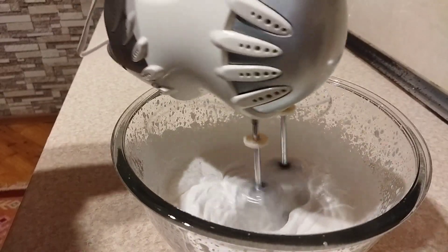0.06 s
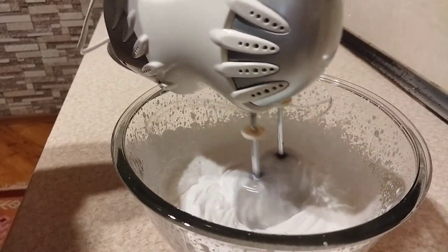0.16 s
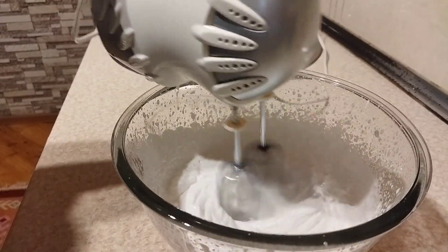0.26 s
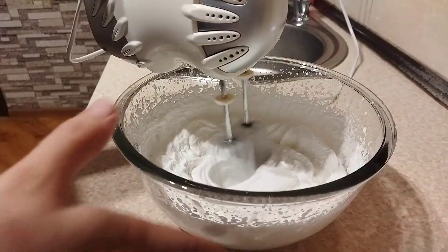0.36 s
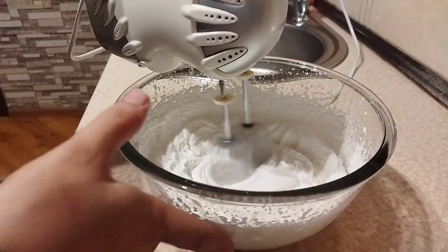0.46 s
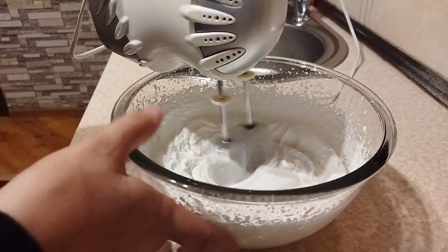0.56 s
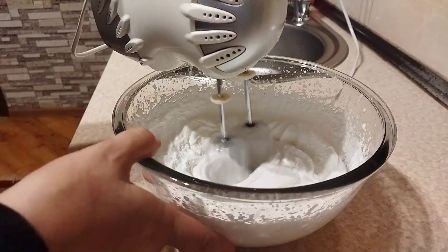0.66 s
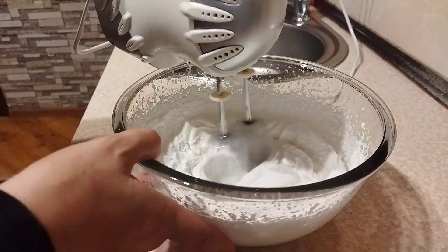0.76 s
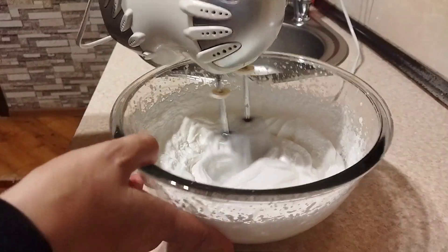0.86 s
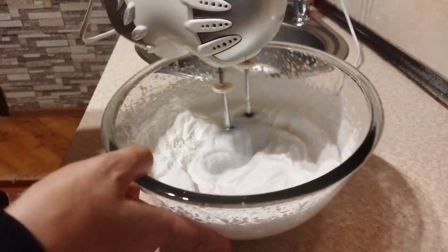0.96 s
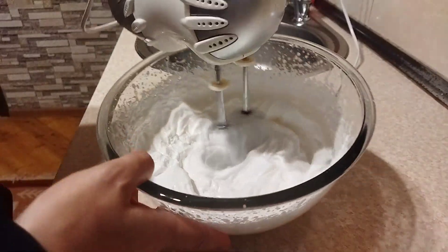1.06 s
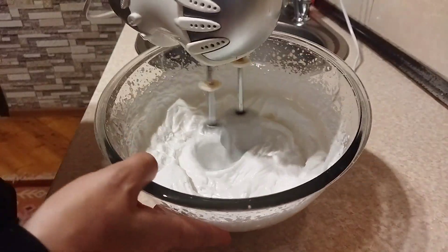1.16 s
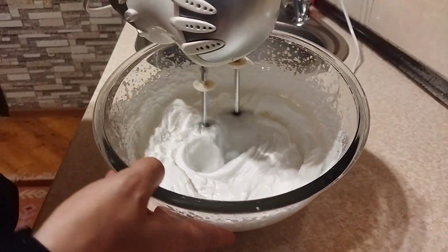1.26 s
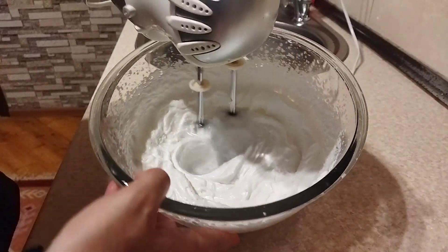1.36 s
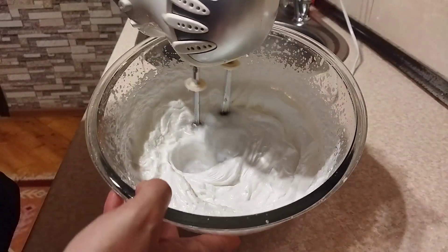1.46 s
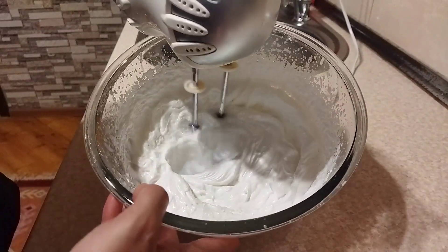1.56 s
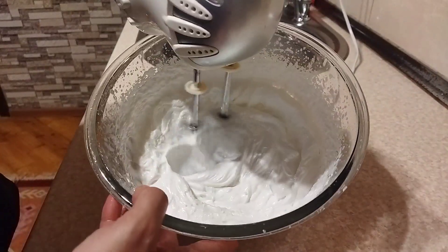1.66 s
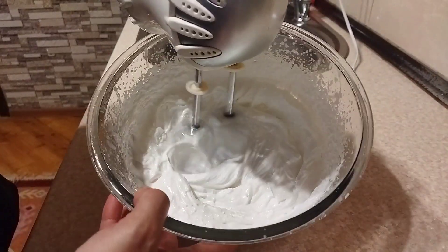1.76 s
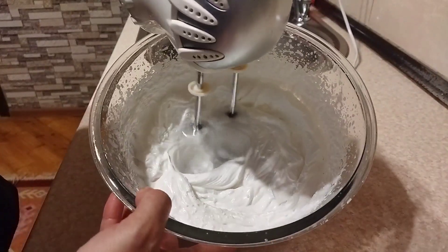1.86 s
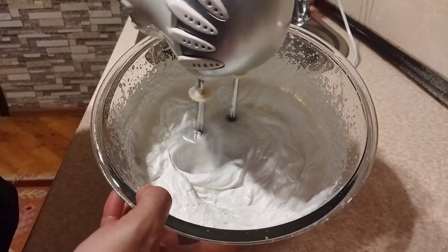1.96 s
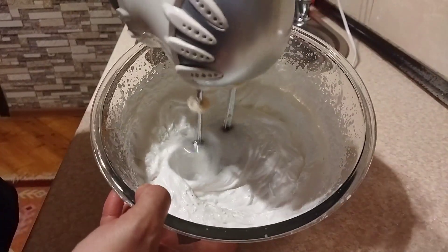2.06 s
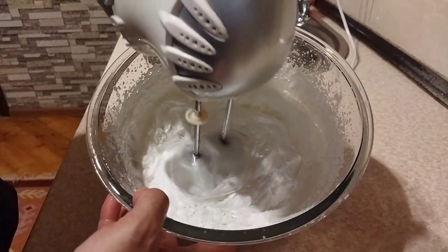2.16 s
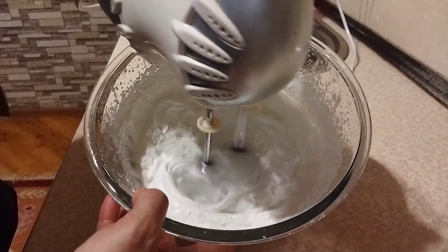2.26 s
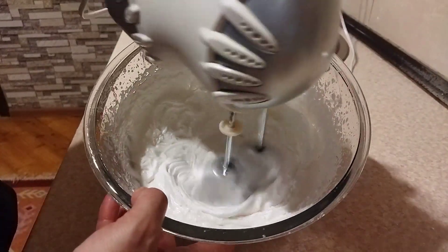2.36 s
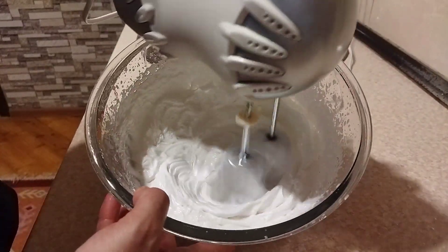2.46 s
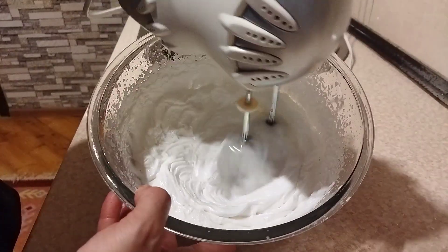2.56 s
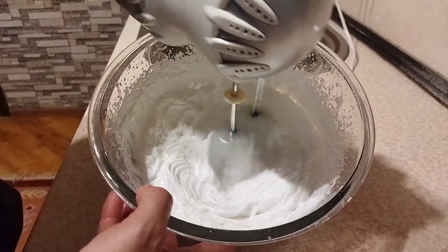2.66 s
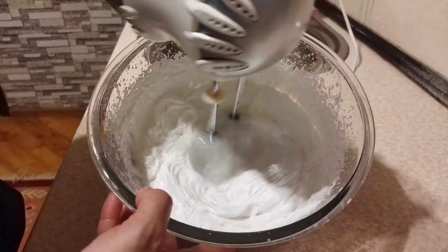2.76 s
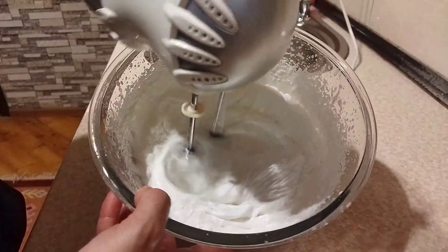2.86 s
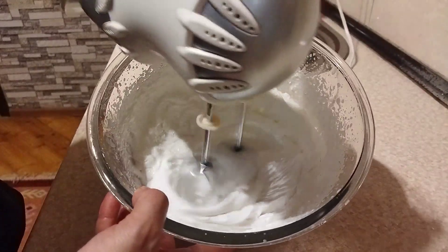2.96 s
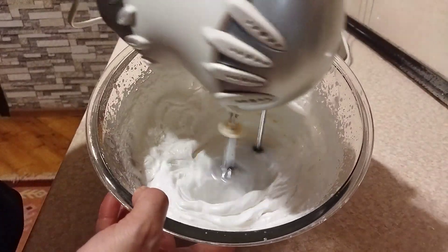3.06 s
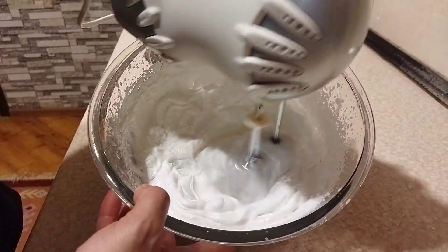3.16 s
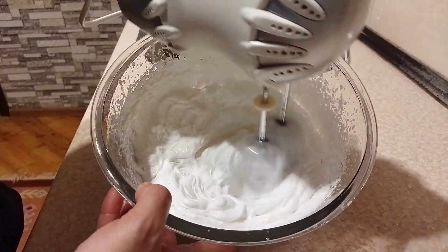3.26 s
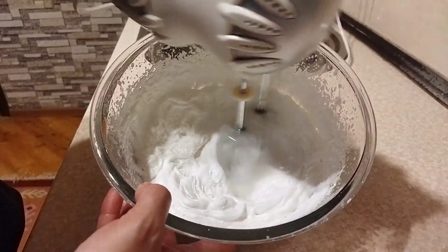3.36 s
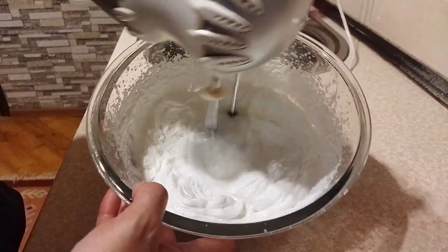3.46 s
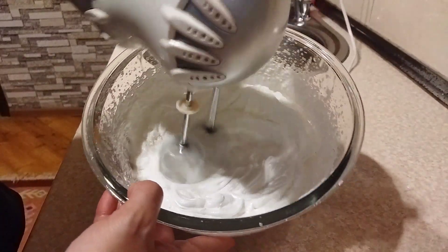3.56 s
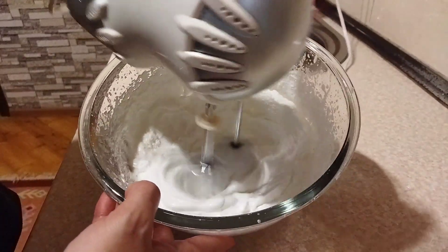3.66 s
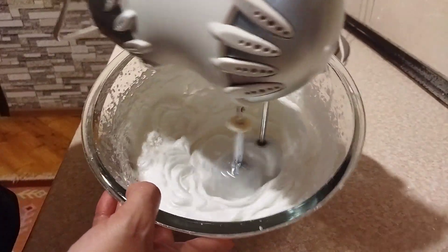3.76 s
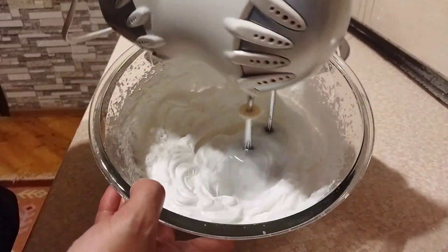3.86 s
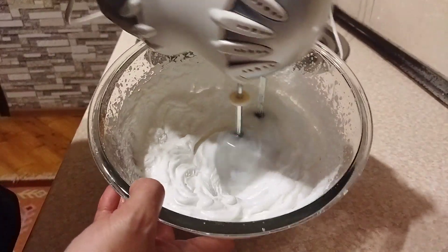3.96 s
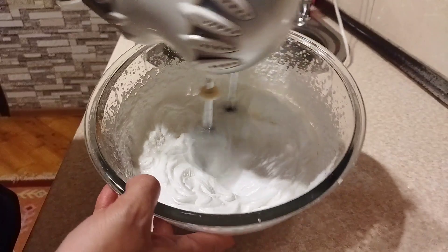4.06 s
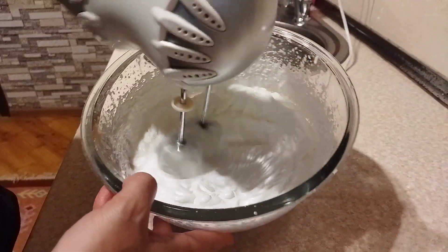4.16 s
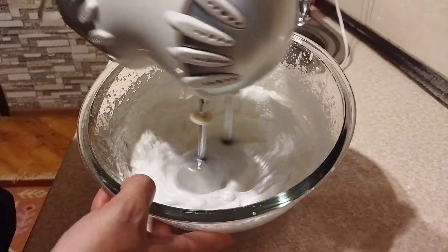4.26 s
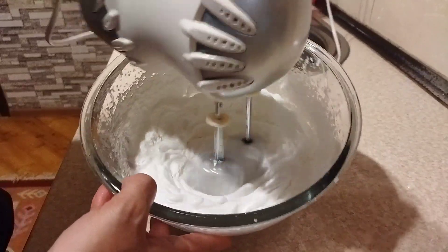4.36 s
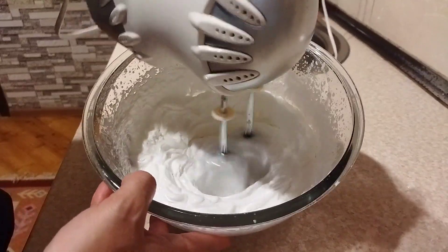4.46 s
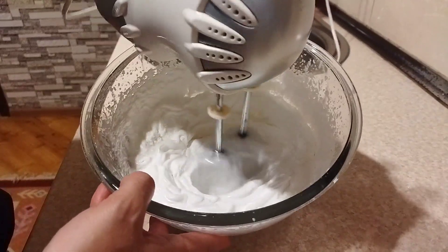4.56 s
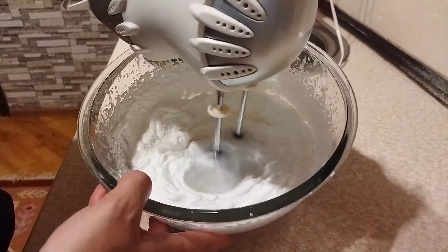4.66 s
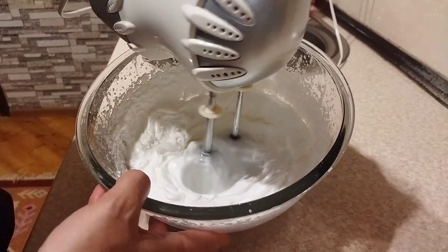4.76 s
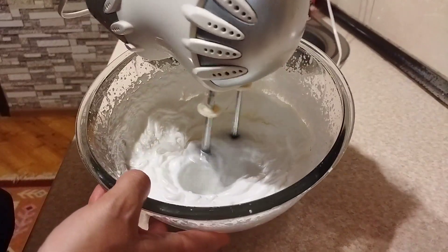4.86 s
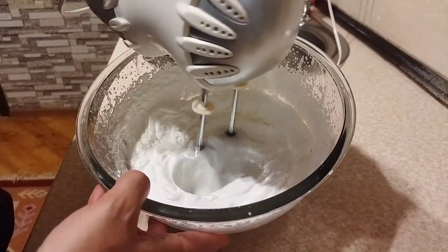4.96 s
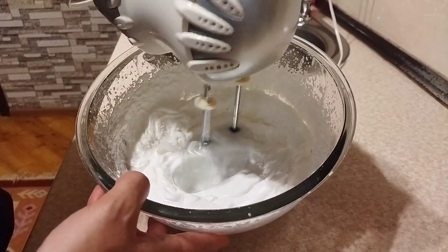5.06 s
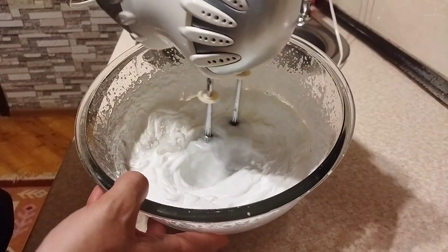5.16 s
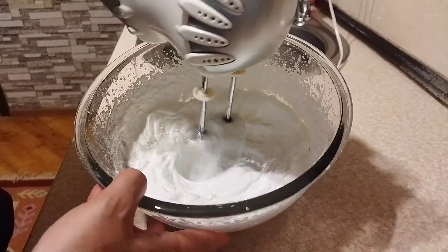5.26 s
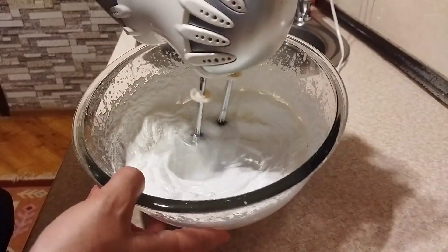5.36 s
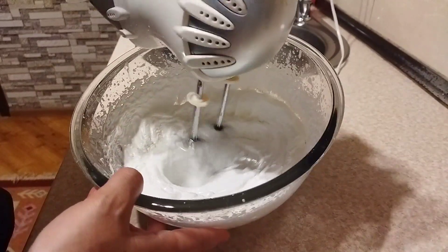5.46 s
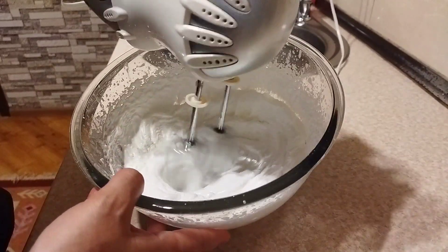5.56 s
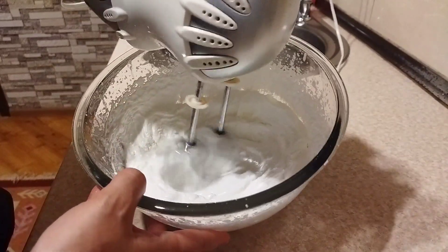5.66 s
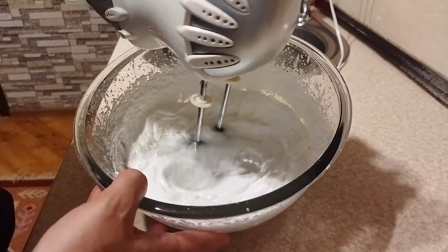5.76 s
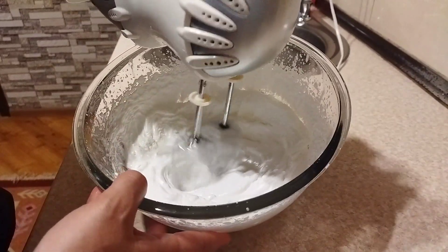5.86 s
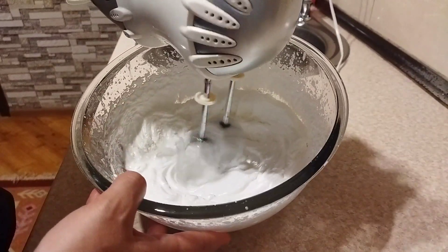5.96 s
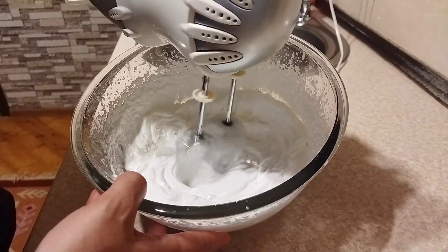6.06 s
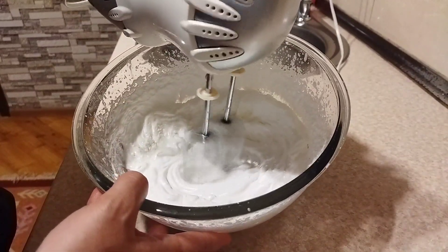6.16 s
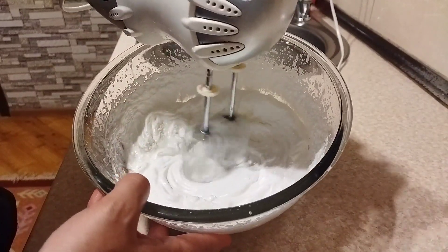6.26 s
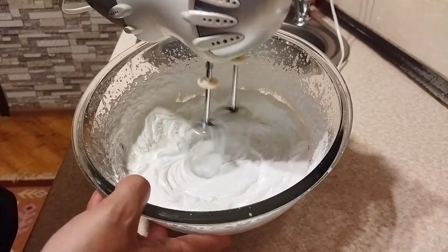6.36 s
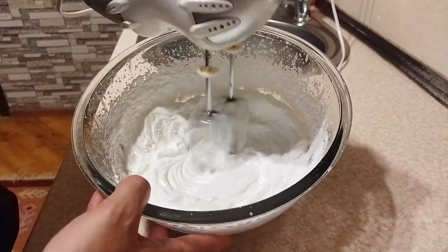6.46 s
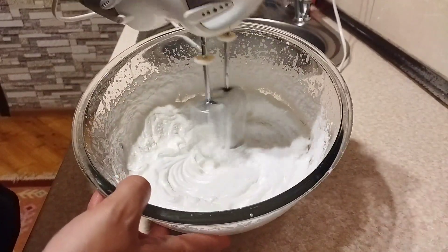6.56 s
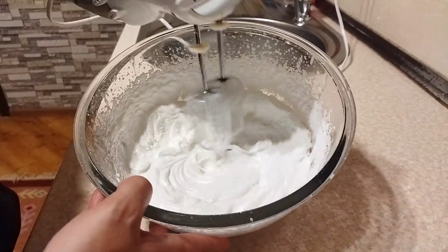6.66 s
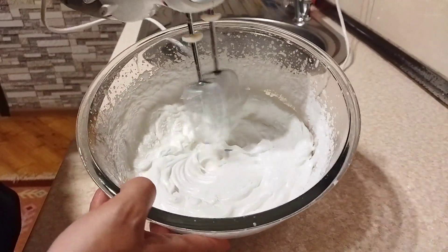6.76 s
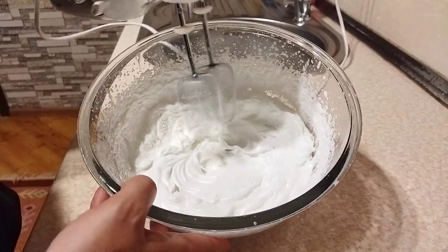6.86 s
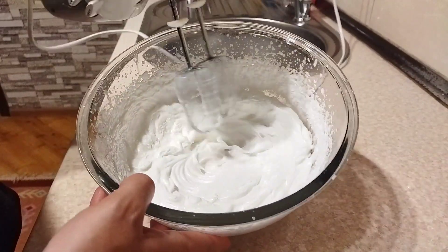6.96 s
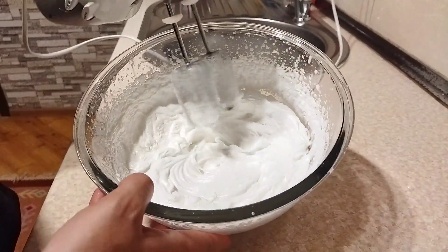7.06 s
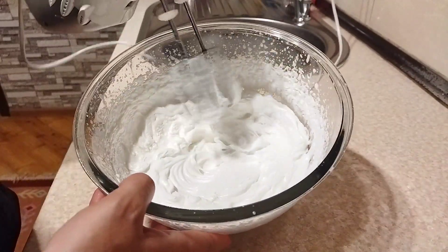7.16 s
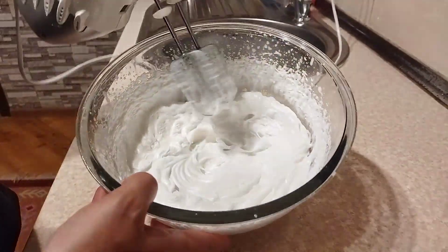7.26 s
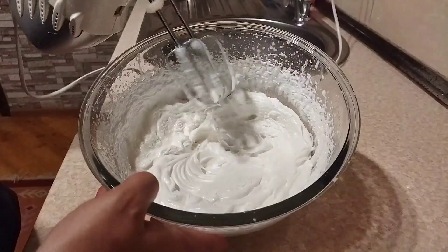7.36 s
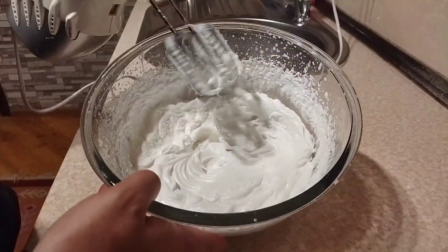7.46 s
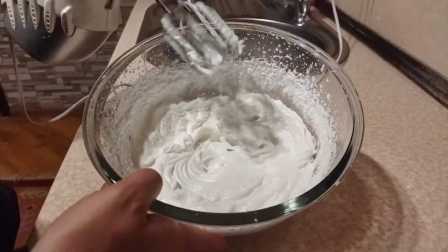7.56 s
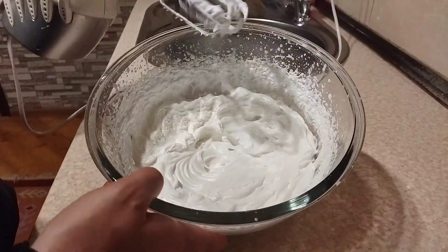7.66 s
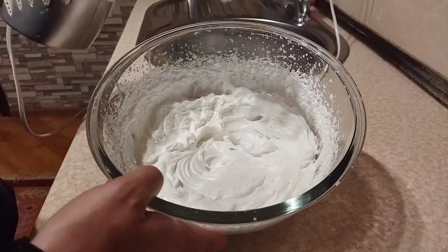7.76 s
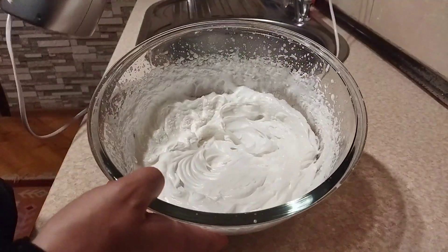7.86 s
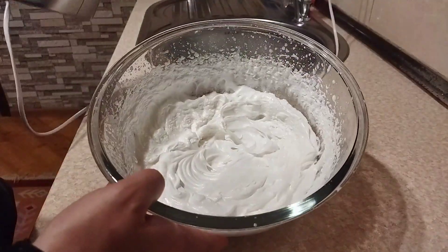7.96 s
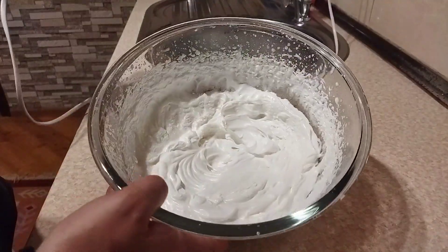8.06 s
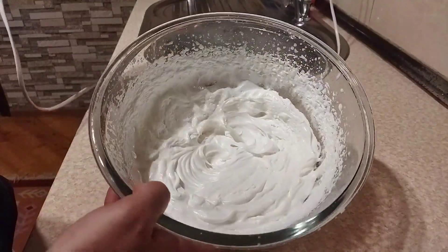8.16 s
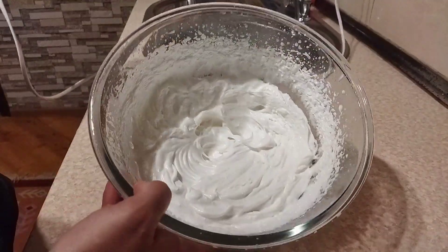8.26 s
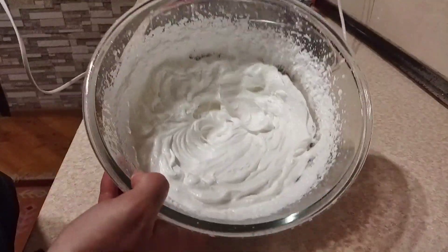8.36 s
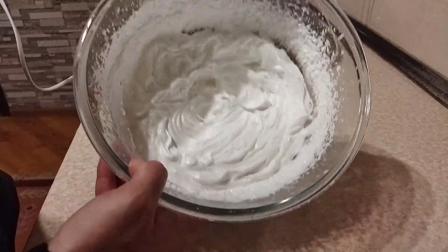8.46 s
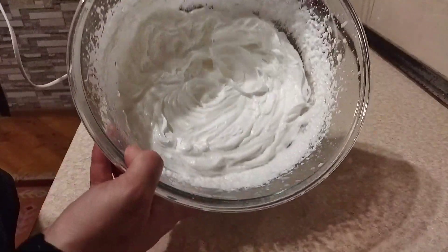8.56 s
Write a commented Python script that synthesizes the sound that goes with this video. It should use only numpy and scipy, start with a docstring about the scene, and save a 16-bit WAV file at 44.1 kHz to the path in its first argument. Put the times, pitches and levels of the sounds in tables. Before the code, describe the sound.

A buzzing hand mixer with a steady motor whine, gear clatter and airy fan noise thumps thick cream in a ringing glass bowl. After a tiny early dropout it runs on with bursts of fluttering slaps, bright scrapes and rattles. Then it coasts downward, softening, until slowing blades tinkle irregularly on the glass. Close stereo pickup, light kitchen reflections, faint high hiss at the end.

```python
"""An electric hand mixer whips cream in a glass bowl on a kitchen counter, close to the microphone.
At first the motor, built from tones locked to its turning shaft, hums and whines; the sound soon breaks
off briefly and swells back. A worm gear turns two beaters, whose blades are pulses that thump the cream
and ring the bowl; noise bursts slap, splash and rasp. Switched off, the motor winds down and is lifted
out, the last blades clink on the glass as ringing modes, and a thin high noise hiss is left and fades."""
import sys
import numpy as np
from scipy import signal
from scipy.fft import rfft, irfft
from scipy.io import wavfile
from scipy.ndimage import uniform_filter1d

SR = 44100
rng = np.random.default_rng(int(sys.argv[2]) if len(sys.argv) > 2 else 0)


def transcribe(u):
    """Save the signal u as a 16-bit wav file named by the first command-line argument.

    u: samples, shape (n,) or (channels, n), limited to [-1, 1]; the rate is SR.
    q: integer samples, one column per channel.
    """
    v = np.clip(np.atleast_2d(u).T, -1, 1)
    q = np.round(v * 32767).astype(np.int16)
    wavfile.write(sys.argv[1], SR, q)


N = 379260
T = np.arange(N) / SR  # time in seconds
FREQS = np.arange(N // 2 + 1) * SR / N  # Hz

# shaft turns per beater turn, and blades that pass in one beater turn
GEAR_RATIO, BLADES = 21.5, 8
# the sound breaks off once; before the break the motor runs a little slower
BREAK_S, BREAK_END_S, OPENING_HZ = .292, .32, 445.4
# switched off, the rotor coasts against air drag (time constant) and bearing friction
OFF_S, OFF_EASE_S, DRAG_S, FRICTION_HZ_PER_S = 5.207, .42, 3.8, 72.4
# the beaters are lifted out and the churning dies away
LIFT_S, LIFT_DB_PER_S = 6.33, 39
# each part: base level in dB, and the power of the speed by which it fades
GEAR_DB, GEAR_POWER = -36.5, 2.12
BRUSH_DB, BRUSH_POWER = -33, 2.42
CHURN_DB, CHURN_POWER = -37, 0.97
# widths of a slap's thud and splash, decay of a tick, ring of a wire to -60 dB
SLAP_S, SPLASH_S, TICK_DECAY_S, WIRE_T60_S = 0.017, 0.022, 0.037, 0.026
TOP_HZ = 16000

# Shaft speed under power, drifting with the load. Each row: time in seconds, speed in Hz.
POWERED_SPEED = [(1.2, 466), (2, 467.6), (3.7, 464.4)]
# Hum tones of the motor shaft. Each row: multiple of the shaft turn, relative level in dB.
SHAFT_ORDERS = [(1, -5), (3, -4), (4, -6.5)]
# Resonances of bowl and housing that shaft overtones fall through. Each row: centre in Hz, width in Hz,
# relative level in dB.
OVERTONE_RESONANCES = [(1020, 140, -36), (2050, 110, -28), (2950, 380, -34)]
# Fan whistle, coming and going as the mixer is moved about. Each row: time in seconds, level in dB.
WHISTLE_LEVEL = [(0, -56), (1.25, -49), (2.7, -53), (2.93, -39), (3.3, -60), (3.62, -39), (3.95, -53),
                 (4.12, -40), (4.7, -47), (5, -44), (5.4, -54), (6.2, -62)]
# Faint gear strands just above the whistle. Each row: multiple of the beater turn, relative level in dB.
GEAR_STRANDS = [(201, -54), (206, -53)]
# Commutator whine, swelling and fading as the mixer is turned. Each row: time in seconds, level in dB.
WHINE_LEVEL = [(0, -44), (1.1, -52), (1.9, -46), (2.28, -43), (2.6, -56), (2.91, -46), (3.22, -54),
               (4.99, -45), (5.8, -45), (6.2, -61)]
# Octave of the commutator whine. Each row: time in seconds, level in dB.
WHINE_OCTAVE_LEVEL = [(0, -41), (.5, -50), (1.1, -55), (1.38, -44), (1.8, -51), (2.65, -42), (3.19, -48),
                      (4.44, -42), (4.85, -56), (5.47, -38), (5.98, -53), (6.4, -48), (7.29, -72)]
# Closeness of the mixer to the microphone. Each row: time in seconds, gain in dB.
CLOSENESS = [(0, 0), (1.8, 0.85), (2.3, 2), (5, 1.5), (5.6, 2.5)]
# Spectrum of the gear housing. Each row: frequency in Hz, relative level in dB per Hz.
GEAR_SPECTRUM = [(150, -11.5), (500, 2.5), (800, -13), (1040, 1.5), (1170, 2), (1300, -14.5), (2100, -11),
                 (2900, -4), (6000, -18)]
# Spectrum of brushes and fan. Each row: frequency in Hz, relative level in dB per Hz.
BRUSH_SPECTRUM = [(300, -7.5), (1500, 4.5), (2300, -1), (3800, 1), (4400, 6), (4900, 2.5), (6400, -1),
                  (7100, -5), (8400, -2), (9800, -2.5), (11000, -14), (11900, 1.5), (16000, -14.5)]
# Drone tones of the loaded beaters. Each row: multiple of the beater turn, relative level in dB.
BEATER_ORDERS = [(11, -16.5), (13, -11.5), (14, -12), (28, -13), (38, -16)]
# How hard the beaters bite into the cream. Each row: time in seconds, gain in dB.
BITE = [(0, -6.5), (.6, 3), (1.4, -1.5), (1.8, -7), (2.2, 3.5), (2.8, -0.5), (5, 0), (5.7, -3)]
# Resonances of the cream-filled bowl. Each row: centre in Hz, width in Hz, relative level in dB.
BOWL_RESONANCES = [(231, 8.1, -0.5), (299.2, 56, 4.5), (453.6, 58, -2.5), (630.5, 50, -6)]
# Shaking of bowl and counter against the churning, less as the beaters leave the bottom.
# Each row: time in seconds, gain in dB.
RUMBLE_LEVEL = [(1.8, -7.5), (2.4, -12.5), (4.4, -7), (4.7, -15.5), (6.2, -10.5), (6.5, -26)]
# Spectrum of wet splatter. Each row: frequency in Hz, relative level in dB per Hz.
SPLATTER_SPECTRUM = [(300, -10), (750, -13.5), (1550, -3.5), (2300, -9), (7000, -17), (16000, -14)]
# Blades slapping into heaped cream. Each row: centre in seconds, relative level in dB.
SLAPS = [(2.204, -29.5), (2.247, -33), (2.294, -32), (2.339, -30.5), (2.384, -31), (2.431, -30.5),
         (2.478, -29), (2.940, -30.5), (2.985, -30.5), (3.028, -30.5), (3.080, -33), (3.122, -30),
         (3.165, -28), (3.214, -27), (3.635, -28.5), (3.678, -29), (3.724, -30), (3.770, -29),
         (3.812, -28.5), (3.859, -26), (3.888, -33), (4.234, -28), (4.284, -32), (4.37, -29),
         (4.421, -28.5), (5.45, -38), (5.665, -37.5), (5.785, -38.5), (5.906, -32.5), (6.04, -35),
         (6.128, -37)]
# Wires rasping along the glass. Each row: centre in seconds, level in dB, width in seconds.
SCRAPES = [(2.64, -29, 0.069), (3.334, -27.5, 0.16)]
# Spectrum of wires rasping on glass. Each row: frequency in Hz, relative level in dB per Hz.
RASP_SPECTRUM = [(900, -13), (1400, -12), (1570, 0), (1750, -4), (7000, -9), (10300, -6), (16000, -15)]
# Beater wires knocking on the wall under the cream. Each row: start in seconds, relative level in dB.
RATTLES = [(2.486, -23), (2.517, -23), (2.846, -26), (3.156, -21), (3.194, -23), (3.238, -22), (3.255, -19),
           (3.286, -20), (3.299, -19.5), (3.85, -32), (4.122, -21), (4.362, -27)]
# Blades clinking on the glass.
# Each row: start in seconds, relative level in dB, centre of the blow's spectrum in Hz.
CLINKS = [(7.371, -1.5, 4700), (7.39, -7, 2580), (7.41, 2.5, 3940), (7.439, -8, 4030), (7.45, 1, 3720),
          (7.502, -6, 3530), (7.545, -0.5, 3730), (7.593, -1, 2300)]
# Modes of bowl and beater. Each row: frequency in Hz, relative level in dB, time to fall 60 dB in seconds.
GLASS_MODES = [(300, 3, 0.3), (422, 6, 0.26), (1120, -8, 0.38), (2045, -19, 0.64), (2084, 1.5, 0.19),
               (3200, -22, 0.6), (3254, 8.5, 0.093), (4690, -18, 0.63), (6400, -6, 0.098),
               (7500, 6.5, 0.065), (10020, 5, 0.048)]
# Spectrum of the thin hiss. Each row: frequency in Hz, relative level in dB per Hz.
HISS_SPECTRUM = [(500, -22.5), (2200, -14), (3700, -13.5), (5500, -18), (8000, -5), (8800, 4),
                 (10800, -5.5), (12000, -2.5), (13300, -2.5), (15500, -2)]
# Course of the thin hiss. Each row: time in seconds, relative level in dB.
HISS_LEVEL = [(0, -40), (6.7, -38.5), (8.36, -41.5), (8.45, -52), (8.6, -62)]
# Small ticks as the mixer is switched off and the bowl is picked up.
# Each row: start in seconds, relative level in dB, centre in Hz.
TICKS = [(5.088, -32, 9000), (8.472, -44.5, 10600)]
# Spectrum of the quiet room. Each row: frequency in Hz, relative level in dB per Hz.
ROOM_SPECTRUM = [(45, -49), (105, -9), (380, -4.5), (600, -18), (6000, -28)]
# Diffuse share of the kitchen. Each row: frequency in Hz, diffuse against direct sound in dB.
DIFFUSE_SHARE = [(80, -18), (250, -8), (1100, -7), (2200, -2)]
# Colour of the two ports. Each row: frequency in Hz, left minus right in dB.
PORT_BALANCE = [(100, -2), (220, 2), (1300, 1), (2400, -2), (8000, 3.5)]


def shaft_speed():
    """Nearly steady under power, then a long coast towards rest (Hz)."""
    powered = np.where(T < BREAK_S, OPENING_HZ, curve(POWERED_SPEED))
    coast_s = np.maximum(T - OFF_S, 0)
    lost = (powered + FRICTION_HZ_PER_S * DRAG_S) * (1 - np.exp(-coast_s / DRAG_S))
    return np.maximum(powered - uniform_filter1d(lost, int(OFF_EASE_S * SR)), 0)


def motor(hz, turns, speed):
    """Shaft hum, which booms, throbs with the beaters and rings as it falls through resonances of bowl and
    housing."""
    hum = tones(turns, SHAFT_ORDERS, waver_db=3, waver_rate=12, blur=0.61) * undb(-48.5) * speed ** 4
    throb_db = walk(12) + 1.5 * speed * np.sin(2 * np.pi * turns / GEAR_RATIO)
    boom_gain = undb(-33 + throb_db) * speed * np.abs(resonance(hz, 273.0, 54)) ** 2
    boom = boom_gain * np.sin(2 * np.pi * turns)
    octave_gain = undb(-46 + throb_db) * speed ** 2 * np.abs(resonance(2 * hz, 390, 90))
    octave = octave_gain * np.sin(4 * np.pi * turns)
    ring = 0
    for order in range(3, 10):
        gain = 0
        for centre_hz, width_hz, db in OVERTONE_RESONANCES:
            gain = gain + undb(db) * np.abs(resonance(order * hz, centre_hz, width_hz)) ** 2
        ring += gain / order * np.sin(2 * np.pi * order * turns + .7 * walk(45))
    return hum + boom + octave + ring * speed ** 2


def whines(hz, turns, coasting):
    """Nine fan blades whistle under gear strands; twelve commutator bars whine, rougher in the coast."""
    def radiated(order):
        """The housing radiates poorly below a corner of 2700 Hz."""
        return 1 / (1 + (2700 / (order * hz + 1)) ** 8)

    whistle = tones(turns, [(9, 0)], waver_db=2.5, waver_rate=22, blur=.6) * radiated(9)
    strands = tones(turns / GEAR_RATIO, GEAR_STRANDS, waver_db=4, waver_rate=3, blur=2)
    strands = strands * (1 - coasting) * (T > BREAK_S) * undb(-2)
    rough = .3 + .6 * coasting ** 2
    whine = 0
    for order, level in [(12, WHINE_LEVEL), (24, WHINE_OCTAVE_LEVEL)]:
        tone = tones(turns, [(order, 0)], waver_db=3.5 * rough, waver_rate=40, blur=rough)
        whine = whine + tone * radiated(order) * undb(curve(level))
    return whistle * undb(curve(WHISTLE_LEVEL)) + strands + whine


def machinery(turns, speed):
    """Gear teeth clatter in a pattern that repeats each beater turn; brushes spark and the fan hisses."""
    beater = turns / GEAR_RATIO
    # 43 pulses, two per shaft turn, make up one beater turn
    teeth = unit(impacts(2 * turns, scatter_db=2, jitter=.1, count=43)) + noise()
    flicker_db = 0.57 * np.sin(2 * np.pi * turns) + 0.74 * np.sin(2 * np.pi * beater) + 2.0 * walk(900)
    sparks = noise() * undb(flicker_db)
    gears = colour(teeth, response(GEAR_SPECTRUM)) * undb(GEAR_DB) * speed ** GEAR_POWER
    brushes = colour(sparks, response(BRUSH_SPECTRUM)) * undb(BRUSH_DB) * speed ** BRUSH_POWER
    return (gears + brushes) * undb(curve(CLOSENESS))


def beater_drone(beater, churn, slaps, speed):
    """The loaded beaters shake the bowl at multiples of their turning rate, harder in each slap."""
    drone = tones(beater, BEATER_ORDERS, waver_db=3.0, waver_rate=9, blur=0.91)
    return drone * (churn + undb(-10.0) * slaps) * speed ** 3


def churning(speed):
    """Force of the beaters on the cream, by bite and speed, fading once they are lifted."""
    lift_db = LIFT_DB_PER_S * np.maximum(T - LIFT_S, 0)
    return undb(CHURN_DB + curve(BITE) - lift_db) * speed ** CHURN_POWER


def slapping():
    """Force of thud and splash as the blades meet heaped cream; slowing blades splash less."""
    thud = sum(undb(db) * swell(s, SLAP_S) for s, db in SLAPS)
    splash = sum(undb(db) * swell(s, SPLASH_S) for s, db in SLAPS)
    return thud, splash * undb(1.5 - 3.2 * np.maximum(T - OFF_S, 0))


def cream(beater, churn, slaps, splashes):
    """Eight blades a turn thump the cream and ring the bowl; deep cuts thud and splatter."""
    blades = impacts(BLADES * beater, scatter_db=0.0, jitter=.12, count=BLADES)
    push = unit(unit(blades) + 0.93 * noise())
    bowl = 0
    for hz, width_hz, db in BOWL_RESONANCES:
        # the second factor narrows the skirts of each resonance
        bowl = bowl + undb(db) * resonance(FREQS, hz, width_hz) * np.abs(resonance(FREQS, hz, 1.5 * width_hz))
    bowl /= np.sqrt(np.mean(np.abs(bowl) ** 2))
    throb = churn * undb(-0.5 + 0.99 * np.sin(2 * np.pi * beater))
    thumps = irfft(rfft(push * (throb + undb(-3) * slaps)) * bowl, N)
    rumble = colour(push, resonance(FREQS, 106.0, 61) ** 3) * undb(curve(RUMBLE_LEVEL)) * churn
    drops = crackle(depth_db=6.5, rate=600) * undb(0.63 * np.cos(2 * np.pi * BLADES * beater))
    splatter = colour(drops, response(SPLATTER_SPECTRUM)) * (splashes + undb(-5) * throb)
    thuds = colour(push, resonance(FREQS, 440, 220) ** 2) * undb(-5.5) * slaps
    return thumps + thuds + rumble + splatter


def scrapes(beater):
    """Beater wires catch and slip on the glass wall in a bright rasp."""
    slips = crackle(depth_db=5.0, rate=420) * undb(2 * np.cos(2 * np.pi * BLADES * beater))
    force = sum(undb(db) * swell(s, width_s) for s, db, width_s in SCRAPES)
    return colour(slips, response(RASP_SPECTRUM)) * force


def rattles(crack_db=-8, crack_s=0.0048):
    """A beater wire knocks on the wall; the cream stifles its ring at once."""
    out, t = np.zeros(N), T[:SR // 8]
    contact = signal.butter(1, [1000, 5000], "band", fs=SR, output="sos")
    for s, db in RATTLES:
        hz = 1550 * (1 + .01 * rng.standard_normal())
        ring = undb(-60 * t / WIRE_T60_S) * np.sin(2 * np.pi * hz * t)
        crack = signal.sosfilt(contact, rng.standard_normal(len(t))) * np.exp(-t / crack_s)
        start = int(s * SR)
        out[start:start + len(t)] += undb(db) * (ring + undb(crack_db) * crack)
    return kitchen(out, wet_db=-9, t60=.25, lead_s=0)


def clinks(crack_s=0.0083, crack_db=-1, buzz_s=0.16, buzz_db=-19, jangle=0.54):
    """Coasting blades strike the glass: wires crack and jangle, the bowl rings on; each contact favours modes."""
    out, t = np.zeros(N), T[:SR // 2]
    hz, mode_db, t60 = np.transpose(GLASS_MODES)[:, :, None]
    buzz_decay = np.exp(-t / buzz_s)
    for s, db, centre_hz in CLINKS:
        detune = 1 + .003 * rng.standard_normal(hz.shape)
        # one stretch of chance per mode jangles its phase
        shake = jangle * walk(250)[:len(hz) * len(t)].reshape(len(hz), -1) * buzz_decay
        favour = np.abs(resonance(hz, centre_hz, centre_hz / 2))
        modes = undb(mode_db - 60 * t / t60) * favour * np.sin(2 * np.pi * hz * detune * t + shake)
        ring = np.sum(modes, axis=0)
        contact = signal.butter(1, [centre_hz / 1.6, 1.9 * centre_hz], "band", fs=SR, output="sos")
        crack_decay = undb(crack_db) * np.exp(-t / crack_s) + undb(buzz_db) * buzz_decay
        crack = signal.sosfilt(contact, rng.standard_normal(len(t))) * crack_decay
        start = int(s * SR)
        out[start:start + len(t)] += undb(db - 22.5) * (ring + crack)
    right_tilt = undb(np.array([[-1], [1]]))
    return kitchen(out, wet_db=-9, t60=.3, lead_s=8 / SR) * right_tilt


def hiss():
    """A thin, fizzy noise hiss and two ticks of decaying, band-shaped noise."""
    fizz = colour(noise() * undb(3.1 * walk(2500)), response(HISS_SPECTRUM))
    fizz *= undb(curve(HISS_LEVEL) + walk(40))
    for s, db, hz in TICKS:
        decay = (T > s) * np.exp(-np.minimum(np.abs(T - s) / TICK_DECAY_S, 20))
        fizz += colour(noise(), resonance(FREQS, hz, hz / 2)) * undb(db) * decay
    return fizz


def background():
    """The thin hiss comes from the left: earlier and louder there."""
    return spread(hiss(), hiss(), lead_s=0.000277) * undb(np.array([[2.5], [-1.5]]))


def room():
    """The quiet room is very soft, steady coloured noise."""
    return undb(-70.5) * colour(noise(), response(ROOM_SPECTRUM))


def tones(turns, orders, waver_db, waver_rate, blur):
    """Multiples of a rotation; each wavers as the mixer moves through the room's standing waves."""
    out = np.zeros((2, N))
    for order, db in orders:
        flutter, drift, sway = walk(waver_rate), walk(waver_rate), walk(2.5)
        # the sway pulls the phases of the two ports apart
        phase = 2 * np.pi * order * turns + blur * drift + 0.47 * sway * np.array([[1], [-1]])
        out += np.sqrt(2) * undb(db + waver_db * flutter) * np.sin(phase)
    return out


def impacts(cycles, scatter_db, jitter, count):
    """A pulse each cycle; their sizes and places repeat after count cycles, blurred by chance."""
    k = np.arange(int(cycles[-1]))
    size, place = rng.standard_normal((2, count))[:, k % count]
    chance = rng.standard_normal((len(k), 2))
    moment = k + 0.22 * place + jitter * chance[:, 0]
    at = np.interp(moment, cycles, np.arange(N)).astype(int)
    return np.bincount(at, undb(2.3 * size + scatter_db * chance[:, 1]), N)


def crackle(depth_db, rate):
    """Noise broken into short grains of bounded size."""
    return noise() * undb(depth_db * 2 * np.tanh(walk(rate) / 2))


def noise():
    """White noise."""
    return rng.standard_normal(N)


def walk(rate):
    """Smooth chance with spread near 1: random points, two per cycle of the rate, joined by lines."""
    steps = T * 2 * rate
    knots = rng.standard_normal(N)[:int(steps[-1]) + 2]
    return 1.45 * np.interp(steps, np.arange(len(knots)), knots)


def swell(s, width_s):
    """A smooth bump around one moment."""
    return np.exp(-np.minimum(2 * ((T - s) / width_s) ** 2, 20))


def curve(rows):
    """(s, value) points joined by straight lines in time."""
    return np.interp(T, *np.transpose(rows))


def undb(db):
    """Decibels to gain."""
    return 10 ** (np.asarray(db) / 20)


def unit(x):
    """Scale to rms 1."""
    return x / np.sqrt(np.mean(x ** 2))


def response(points):
    """Gain at every frequency from (Hz, dB) points."""
    hz, db = np.transpose(points)
    return undb(np.interp(np.log(FREQS + 1), np.log(hz), db))


def colour(x, gain):
    """Filter by a gain curve; rms 1."""
    return unit(irfft(rfft(x) * gain, N))


def resonance(hz, centre_hz, width_hz):
    """Complex gain of one resonance, 1 at its centre."""
    return 1j * hz * width_hz / (centre_hz ** 2 - hz ** 2 + 1j * hz * width_hz)


def spread(direct, diffuse, lead_s):
    """The direct sound reaches the left port first; the scattered sound differs between the ports."""
    share = response(DIFFUSE_SHARE)
    mid, side = rfft([direct, diffuse]) / np.sqrt(1 + share ** 2)
    delay = np.exp(-2j * np.pi * FREQS * lead_s)
    return irfft([mid + share * side, (mid - share * side) * delay], N)


def kitchen(x, wet_db, t60, lead_s):
    """Direct sound, right port late by the lead, and dense reflections unrelated at the two ports."""
    t = T[:SR // 2]
    # a strong early burst from the counter, then the walls
    decay = undb(-60 * t / t60) + 5 * np.exp(-t / 0.005)
    tail = rng.standard_normal((2, len(t))) * decay
    tail /= np.sqrt(np.sum(tail ** 2, axis=1, keepdims=True))
    direct = np.array([x, np.interp(T - lead_s, T, x)])
    return direct + undb(wet_db) * signal.fftconvolve(x[None], tail, axes=1)[:, :N]


def dropout(before_db=5, hole_db=-27, return_db=-11, after_db=1.5, recover_s=0.18):
    """Gain that drops out at the break and swells back."""
    recovery = np.interp(T, [BREAK_END_S, BREAK_END_S + recover_s], [return_db, after_db])
    return undb(np.select([T < BREAK_S, T < BREAK_END_S], [before_db, hole_db], recovery))


def scene():
    """The motor's rotation drives everything that the mixer does."""
    hz = shaft_speed()
    speed = hz / hz.max()
    turns = np.cumsum(hz) / SR
    beater = turns / GEAR_RATIO
    coasting = np.clip(T - OFF_S, 0, 1)  # rises to 1 in the first second after switching off
    churn = churning(speed)
    slaps, splashes = slapping()

    def noisy_parts():
        """Everything made of noise and pulses, with fresh chance each time."""
        return machinery(turns, speed) + cream(beater, churn, slaps, splashes) + scrapes(beater) + room()

    mixer = spread(noisy_parts(), noisy_parts(), lead_s=.00011)
    mixer = mixer + motor(hz, turns, speed) * undb(curve(CLOSENESS)) + whines(hz, turns, coasting)
    mixer = mixer + beater_drone(beater, churn, slaps, speed)
    return mixer + rattles() + clinks() + background()


def record(dry):
    """The sound breaks off briefly and swells back; the ports differ in colour; deep bass and top are cut."""
    tilt = response(PORT_BALANCE) ** np.array([[.5], [-.5]])
    sound = irfft(rfft(dry * dropout()) * tilt, N)
    sound = signal.sosfilt(signal.butter(6, 64, "high", fs=SR, output="sos"), sound)
    return signal.sosfilt(signal.ellip(10, .2, 80, TOP_HZ, fs=SR, output="sos"), sound)


dry = scene()
out = record(dry)
transcribe(out)
```